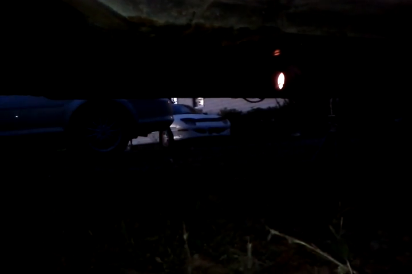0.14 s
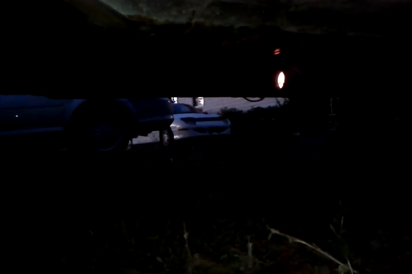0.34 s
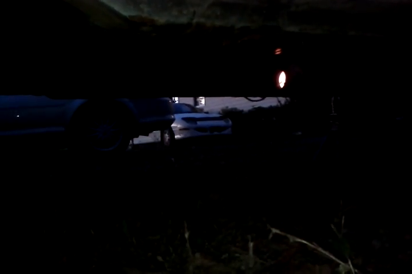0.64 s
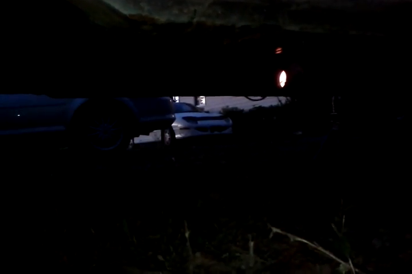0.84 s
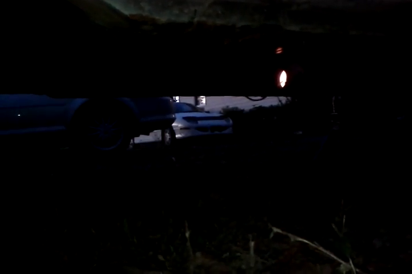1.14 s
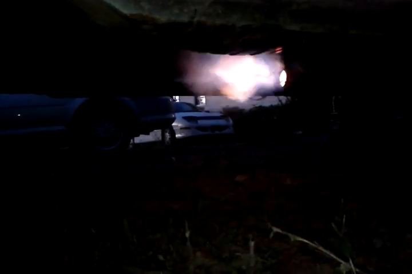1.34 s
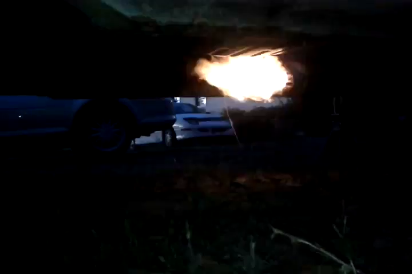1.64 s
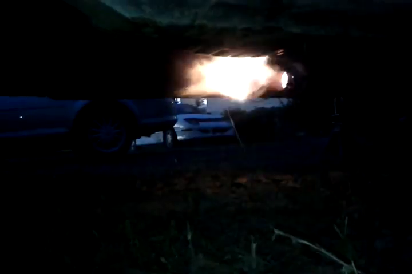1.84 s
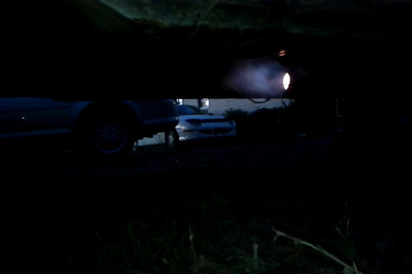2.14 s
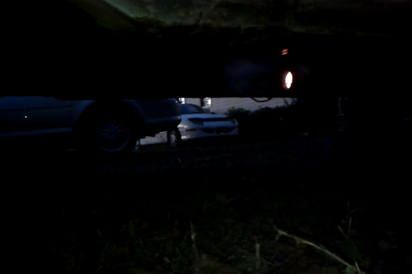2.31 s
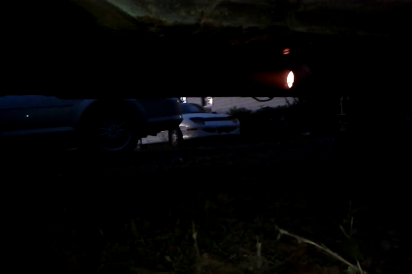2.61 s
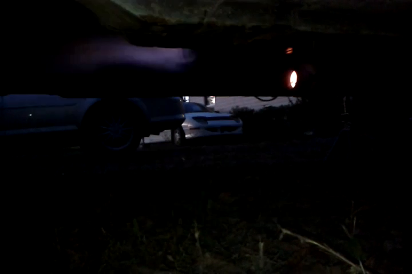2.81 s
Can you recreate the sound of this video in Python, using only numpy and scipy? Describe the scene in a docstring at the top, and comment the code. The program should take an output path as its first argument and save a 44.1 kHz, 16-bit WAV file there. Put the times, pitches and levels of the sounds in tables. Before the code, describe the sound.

Close beside a flaming open tailpipe outdoors, fast muffled limiter bangs give way to a short dip, then a harsh distorted rev climbs with crackling misfires, cracks hard near the end and starts falling.

```python
"""An engine stutters on its limiter: rising bangs over a drone, with a flaming open exhaust up close.
It bogs down, revs up in two pushes with misfires and pops, cracks loudly and starts to fall.
Four cylinders swing the pressure once per firing; random puffs of gas ring the pipe; chirps make the bangs.
Pops are short noise bursts and the flame's crackle is random clicks.
An overloaded microphone squares off the wave, so every firing is heard as a pair of hard snaps."""
import sys
import numpy as np
from scipy import signal
from scipy.io import wavfile
from scipy.ndimage import uniform_filter1d

SR = 44100
rng = np.random.default_rng(int(sys.argv[2]) if len(sys.argv) > 2 else 0)


def int16_out(signal):
    """Quantize to a 16-bit WAV file."""
    q = np.round(np.clip(np.atleast_2d(signal).T, -1, 1) * 32767)
    wavfile.write(sys.argv[1], SR, q.astype(np.int16))


N = 130977
T = np.arange(N) / SR  # time, s

# Engine speed as firing rate: t/s, f/Hz
FIRING_RATE = [(0, 72.6), (.21, 72.4), (.91, 69.3), (1.06, 66.4), (1.15, 66.3), (1.26, 77.7), (1.4, 91.9),
               (1.47, 89.4), (1.53, 90), (1.6, 99), (1.74, 130.8), (1.9, 162.9), (1.97, 170), (2.03, 164.5),
               (2.13, 162), (2.18, 168), (2.29, 187.4), (2.51, 254), (2.58, 271), (2.66, 268), (2.97, 240)]
# Engine effort: t/s, overall exhaust level/dB, share of the firing wave/dB
EFFORT = [(0, 29, -10), (.885, 28, -14.5), (.91, 28.5, 8), (.97, 28.5, -2.5), (1.02, 8.5, -17),
          (1.08, 23.5, 1.5), (1.16, 34, -2.5), (1.75, 47.5, -3), (2.1, 41.5, -6), (2.5, 47.5, -3.5),
          (2.97, 39, -7)]
# Overtone that makes the firing wave lopsided: t/s, level/dB
LOPSIDED = [(0, -7), (1.6, -5.5), (2.2, -9), (2.45, -13.5), (2.6, -24), (2.7, -14), (2.97, -13)]
# Roughness of the note, from the tones between the firing harmonics: t/s, level/dB
ROUGHNESS = [(0, 1), (1.2, -13), (1.9, -7.5), (2.0, 4.5), (2.12, 7.5), (2.2, -2), (2.55, -4.5), (2.68, 2),
             (2.97, 4)]
# Tones between the firing harmonics, which roughen the note: multiple of the firing rate, level/dB
BETWEEN_TONES = [(.5, -13), (.875, -24), (1.375, -21), (1.5, -15)]
# Misfires, where the pressure sags: t/s, length/s, depth (swing of the firing wave = 1)
MISFIRES = [(1.985, 0.0085, 0.87), (2.094, 0.013, 0.86), (2.575, 0.0057, 2.3), (2.585, .005, 1.2),
            (2.646, 0.0049, 2.4)]
# Ragged burning that rings the pipe, under the overall exhaust level: t/s, level/dB
RAGGED = [(0, -21.5), (.88, -15), (.94, -18), (1.0, -10.5), (1.1, -11), (1.19, 0.5), (1.24, -12),
          (1.42, -11.5), (1.49, -7), (1.59, -15), (1.7, -4), (1.75, -5), (1.8, -12.5), (1.94, -11.5),
          (2.02, -6), (2.12, -12), (2.17, -2), (2.2, -11), (2.55, -17.5), (2.59, -4), (2.65, -4.5),
          (2.69, -18.5), (2.97, -14)]
# Pipe resonances: f/Hz, half the bandwidth of each of two filter passes/Hz, level/dB
PIPE = [(68.2, 50, -9), (170.3, 50, -1.5), (267.7, 70, 0), (419.3, 97, -9)]
# Repeating round of three limiter bangs, before scatter:
# delay/s, relative level/dB, starting f/Hz, rise/(Hz per s)
BANG_ROUND = [(.016, -1, 200, 7000), (.021, 0, 200, 8500), (.018, -4.5, 200, 4900)]
# Drone of the pipe on the limiter: multiple of the firing rate, level/dB
DRONE = [(2, -9), (3, -3.5)]
# Afterfire pops at the tailpipe: t/s, level/dB, decay/s, f/Hz
POPS = [(1.048, 5, .004, 900), (1.116, 19, .001, 1200), (1.145, 23, .002, 1000), (1.2393, 31.5, .001, 1500),
        (1.254, 31, .001, 1200), (1.394, 41, .001, 1200), (1.6618, 36, .001, 1600),
        (1.742, 38.5, .002, 1200), (1.759, 44, .001, 1800), (1.767, 42, .001, 1800),
        (1.802, 40.5, .001, 2500), (1.821, 40, .001, 2500), (1.844, 42, .0015, 900),
        (1.8564, 36, .001, 2500), (1.877, 39, .001, 2500), (1.913, 26, .001, 1200),
        (1.9187, 37, .0015, 3200), (2.016, 29, .001, 2000), (2.1712, 13, .0015, 2500),
        (2.181, 42, .001, 2500), (2.2056, 32, .001, 2000), (2.282, 36.5, .0015, 1800),
        (2.3612, 41.5, .002, 2000), (2.3807, 40, .001, 4000), (2.4351, 29, .001, 3000),
        (2.452, 42.5, .001, 2000), (2.5009, 26, .001, 3500), (2.5254, 34, .001, 2500),
        (2.5765, 48, 0.00042, 1600), (2.5962, 39.5, .0015, 2500), (2.644, 34, .001, 4000),
        (2.6531, 56, 0.00092, 3000), (2.659, 12, .001, 4000), (2.6695, 49.5, 0.00093, 4500),
        (2.6885, 29, .004, 4500), (2.7354, 25, .003, 4500)]
# Crackle of the flame, under the overall exhaust level: t/s, level/dB
CRACKLE = [(0, -32.5), (1.2, -28), (2.1, -39.5), (2.6, -33), (2.69, -19.5), (2.78, -23.5), (2.97, -43)]
# Treble let through after the microphone: t/s, level/dB
TREBLE = [(0, -20), (1.08, -28.5), (1.16, -12), (2.97, -6)]

WOBBLE_CYCLES = 0.0062  # spread of the firing timing, firings
SCATTER_DB, PUFF_CYCLES = 3, .6  # spread of puff size; puff decay in firings
GAS_DB, GAS_HZ = -46.5, 2200  # hiss at the pipe's mouth
LIMITER_END_S, BANG_S, BANG_DECAY_S = .88, .036, 0.021
BANG_SCATTER = 0.0268  # spread of bang pitch, as a fraction
CRACKLE_PER_S, CRACKLE_HZ = 1200, 4200  # average click rate; click pitch
MIC_DB, SPIKE_DB, SPIKE_HZ = -4, -54, 1770  # saturated path; spikes that get through
LOW_CUT_HZ, LOW_CUT_Q, DULL_HZ = 174.4, 0.5, 1190  # bass cut; where the treble splits off
CEILING, ROLL_OFF_HZ, TOP_HZ = 0.7, 7285, 8800  # peak cap; two top cuts


def undb(db):
    """Decibels to gain."""
    return 10 ** (np.asarray(db) / 20)


def curve(rows, axis=1):
    """One column of a table, joined by straight lines in time."""
    rows = np.array(rows, float)
    return np.interp(T, rows[:, 0], rows[:, axis])


def unit(x):
    """Scale to an rms of one."""
    return x / np.std(x)


def band(x, hz, width):
    """A two-pole resonance with gain one at its centre."""
    g = np.tan(np.pi * hz / SR)
    k = width / hz
    top = [g * k, 0, -g * k]
    bottom = [1 + g * k + g * g, 2 * g * g - 2, 1 - g * k + g * g]
    return signal.lfilter(top, bottom, x)


def walk(rate):
    """Smooth random wander with a spread of one, heading for a new value `rate` times a second."""
    hold = int(SR / rate)
    steps = np.repeat(rng.standard_normal(N // hold + 1), hold)
    return unit(uniform_filter1d(steps, hold)[:N])


def firing_wave(phase):
    """Pressure swings once per firing; tones between the harmonics roughen it and misfires sag it."""
    turn = 2 * np.pi * (phase + WOBBLE_CYCLES * walk(120))
    swing = np.cos(turn) + undb(curve(LOPSIDED)) * np.cos(2 * turn)
    rough = sum(undb(db) * np.sin(multiple * turn) for multiple, db in BETWEEN_TONES)
    sag = sum(depth * np.exp(-(2 * (T - at) / length) ** 2) for at, length, depth in MISFIRES)
    return swing + undb(curve(ROUGHNESS)) * rough - sag


def gas(phase):
    """Each firing lets out a puff of random size that rings the pipe and hisses at its mouth."""
    size = undb(SCATTER_DB * rng.standard_normal(N))[phase.astype(int)]
    puffs = size * np.exp(-(phase % 1) / PUFF_CYCLES) * rng.standard_normal(N)
    ring = np.zeros(N)
    for hz, width, db in PIPE:
        once = band(puffs, hz, 2 * width)
        ring += undb(db) * band(once, hz, 2 * width)
    hiss = band(puffs, GAS_HZ, 2 * GAS_HZ)
    return undb(curve(RAGGED)) * unit(ring) + undb(GAS_DB) * unit(hiss)


def limiter(phase):
    """Every second firing bangs in the pipe with a quickly rising pitch, over a steady drone."""
    bangs = np.zeros(N)
    starts = np.interp(np.arange(0, phase[-1], 2), phase, T)
    starts = starts[starts < LIMITER_END_S]
    chance = rng.standard_normal((len(starts), 2))  # pitch, level
    for i, start in enumerate(starts):
        delay, db, hz, rise = BANG_ROUND[i % len(BANG_ROUND)]
        age = np.clip(T - start - delay, 0, BANG_S)
        arch = np.sqrt(np.abs(np.sin(np.pi * age / BANG_S)))
        swell = arch * np.exp(-age / BANG_DECAY_S)
        cycles = (hz * age + rise * age ** 2 / 2) * (1 + BANG_SCATTER * chance[i, 0])
        bangs += 2 * undb(db + chance[i, 1]) * swell * np.sin(2 * np.pi * cycles)
    drone = sum(undb(db) * np.sin(2 * np.pi * multiple * phase) for multiple, db in DRONE)
    fade_out = np.clip((LIMITER_END_S - T) / BANG_S + 1, 0, 1)
    return bangs + drone * fade_out


def pops():
    """Unburnt fuel goes off at the tailpipe in very short bursts of pitched noise."""
    out = np.zeros(N)
    age = T[:2048]
    for start, db, decay, hz in POPS:
        noise = unit(band(rng.standard_normal(len(age)), hz, hz))
        burst = undb(db) * np.exp(-age / decay) * noise
        i = int(start * SR)
        out[i:i + len(age)] += burst[:N - i]
    return out


def crackle():
    """The burning gas crackles in tiny clicks of unequal size."""
    clicks = (rng.random(N) < CRACKLE_PER_S / SR) * rng.standard_normal(N)
    return undb(curve(CRACKLE)) * unit(band(clicks, CRACKLE_HZ, CRACKLE_HZ / 2))


def scene():
    """Everything leaves the one tailpipe; a pressure of one is where the microphone overloads."""
    phase = np.cumsum(curve(FIRING_RATE)) / SR  # firings so far
    firing = undb(curve(EFFORT, axis=2)) * firing_wave(phase)
    exhaust = firing + gas(phase) + limiter(phase) + crackle()
    return (undb(curve(EFFORT)) * exhaust + pops())[None]


def record(dry):
    """The microphone saturates but passes sharp spikes; the recorder thins, dulls and caps the sound."""
    squared = undb(MIC_DB) * dry / (1 + np.abs(dry))
    w = 2 * np.pi * LOW_CUT_HZ
    low_cut = signal.bilinear([1, 0, 0], [1, w / LOW_CUT_Q, w * w], SR)
    thin = signal.lfilter(*low_cut, squared)
    dull = signal.lfilter(*signal.butter(1, DULL_HZ, fs=SR), thin)
    treble = undb(curve(TREBLE)) * (thin - dull)
    spikes = signal.sosfilt(signal.butter(4, SPIKE_HZ, 'high', fs=SR, output='sos'), dry)
    mix = dull + treble + undb(SPIKE_DB) * spikes
    capped = mix / (1 + (mix / CEILING) ** 8) ** (1 / 8)
    rolled_off = signal.sosfilt(signal.butter(12, ROLL_OFF_HZ, fs=SR, output="sos"), capped)
    return signal.sosfilt(signal.ellip(10, .2, 80, TOP_HZ, fs=SR, output="sos"), rolled_off)


dry = scene()
out = record(dry)
int16_out(out)
```